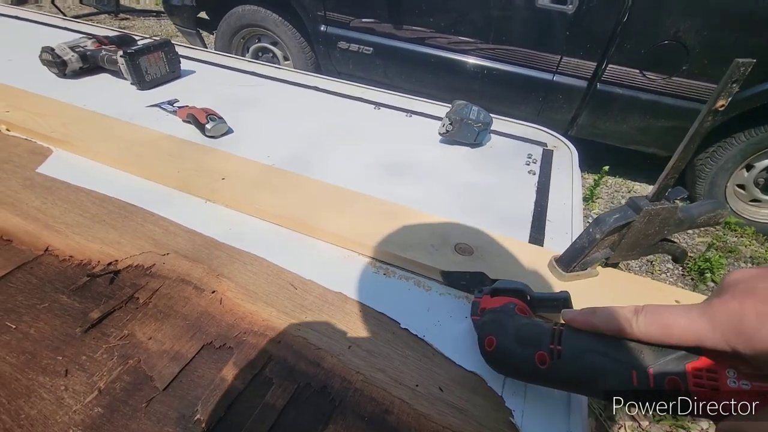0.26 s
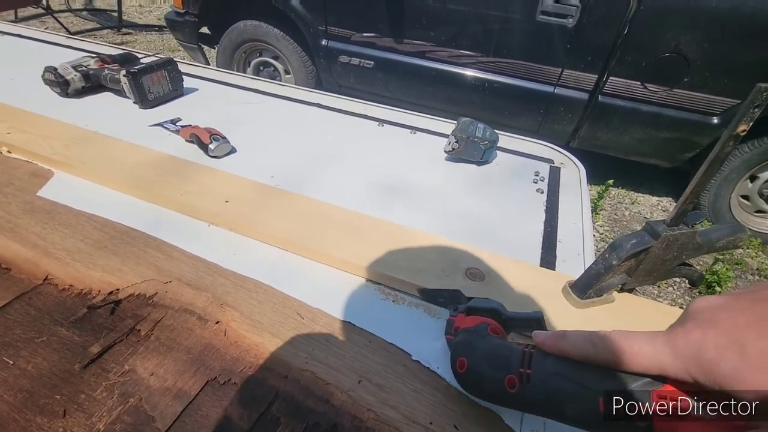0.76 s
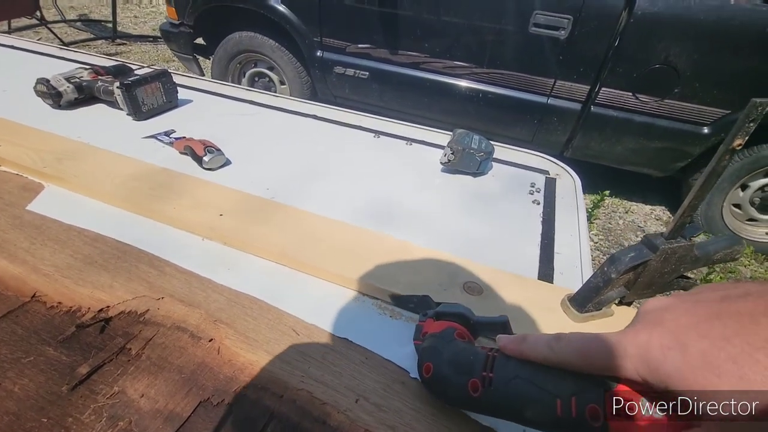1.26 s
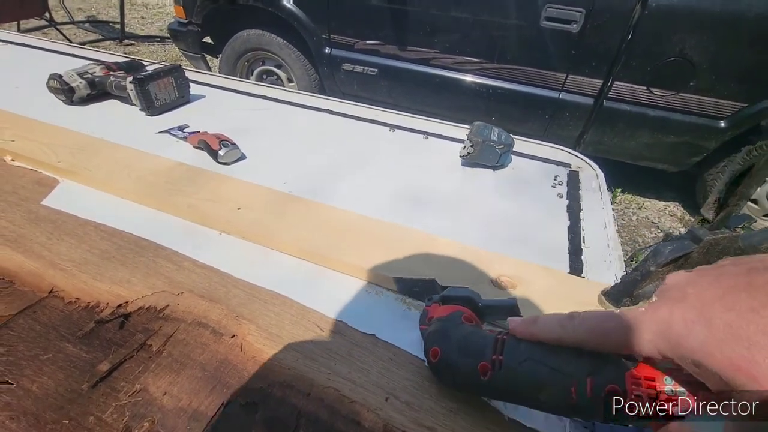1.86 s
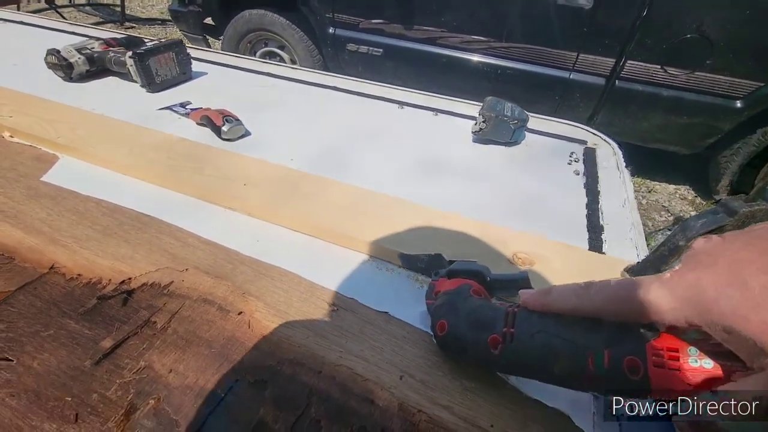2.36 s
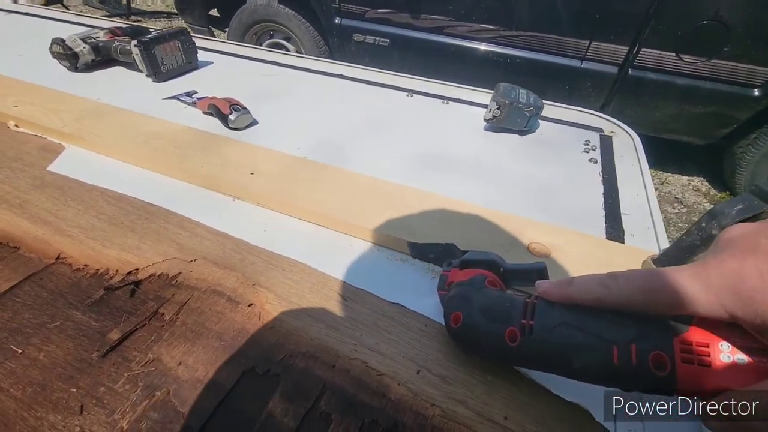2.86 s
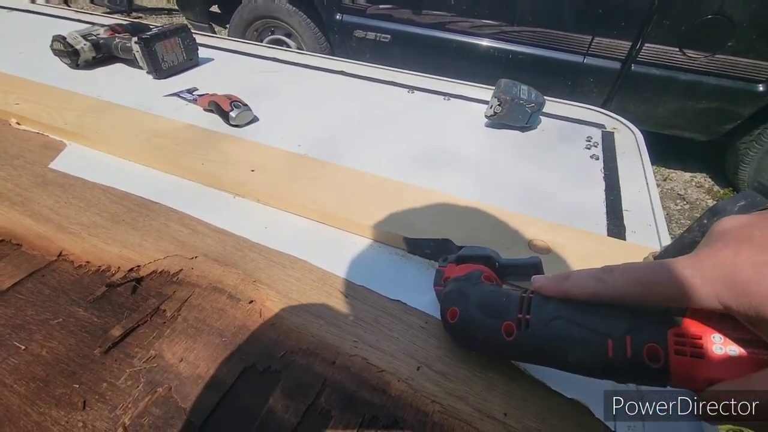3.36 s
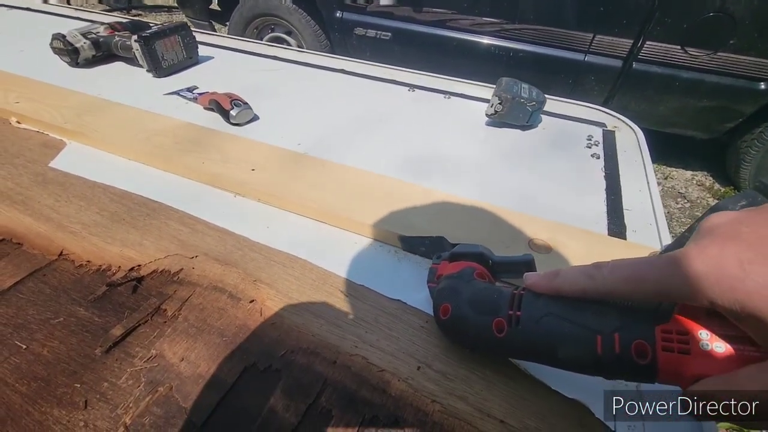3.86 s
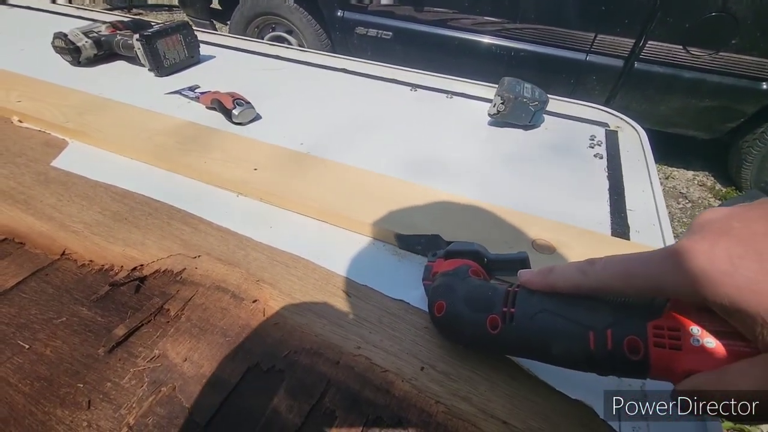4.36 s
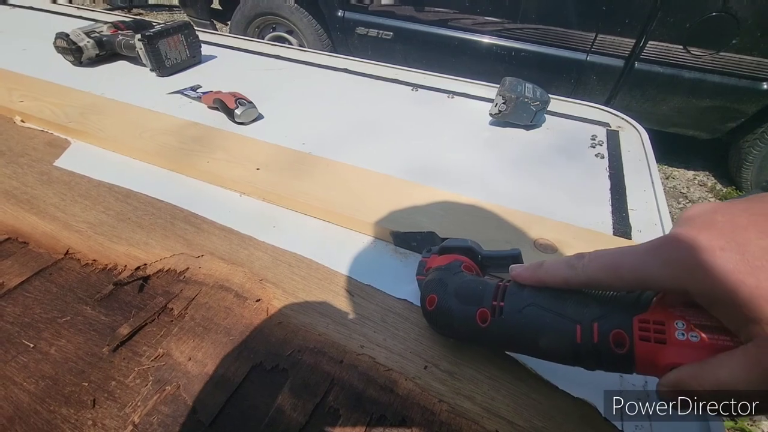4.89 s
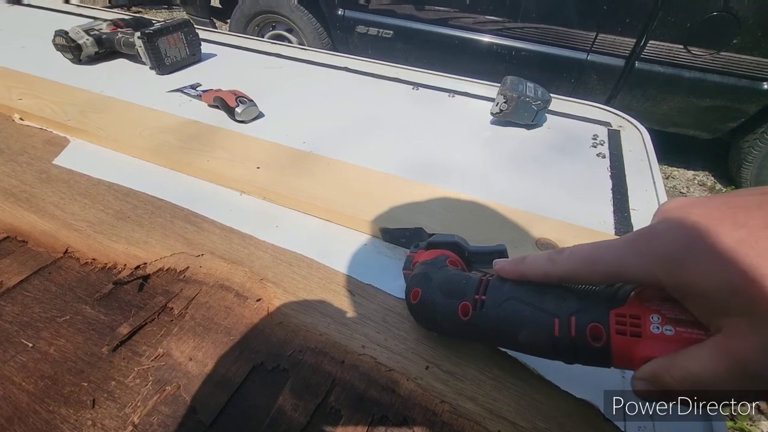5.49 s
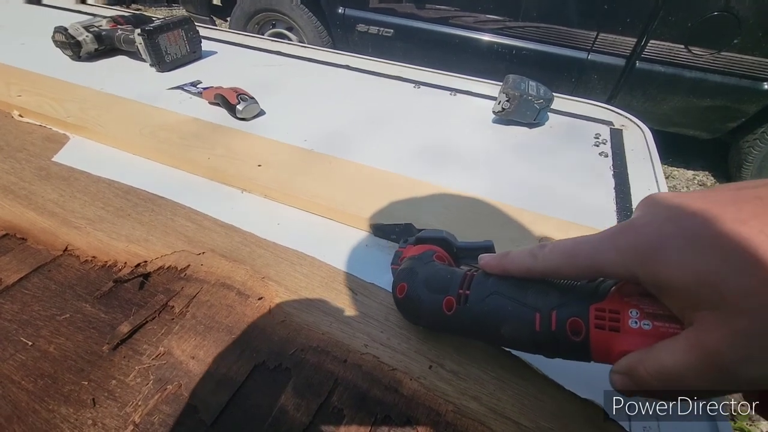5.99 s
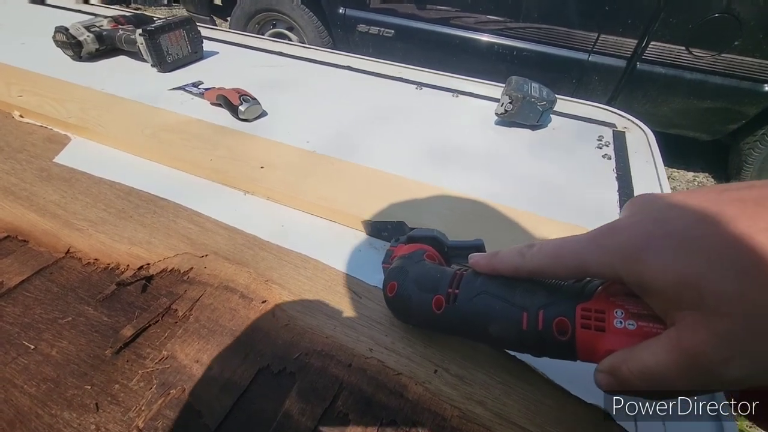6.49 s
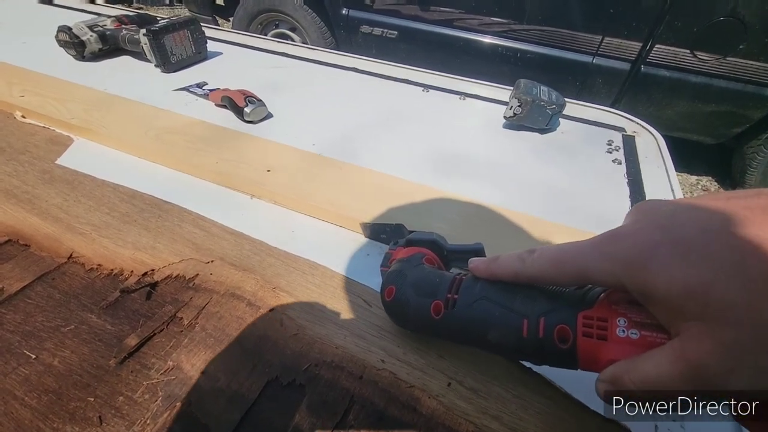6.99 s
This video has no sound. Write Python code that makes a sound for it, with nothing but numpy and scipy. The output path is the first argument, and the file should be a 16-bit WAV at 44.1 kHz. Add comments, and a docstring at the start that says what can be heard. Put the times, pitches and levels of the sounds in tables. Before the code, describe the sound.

Close up and outdoors, an oscillating saw buzzes without a break as its blade works into a wooden panel. The panel hums while the teeth add a gritty hiss, smoother for a moment early on and rougher later. The blade sings briefly at shifting high pitches. Three dull little bumps come around the middle, and low gusts of wind buffet the microphone, mostly toward the end.

```python
"""Oscillating saw cutting a wood panel

Outdoors, a battery tool swings its blade about 250 times a second. The panel hums at low multiples of
that rate, the housing and blade buzz at high ones, and the teeth rasp on every stroke. The tool bumps
the panel a few times, and wind buffets the two nearby microphones, left and right."""
import sys
import numpy as np
from scipy import signal
from scipy.fft import rfft, irfft, next_fast_len
from scipy.io import wavfile
from scipy.ndimage import uniform_filter1d, map_coordinates

SR = 44100
rng = np.random.default_rng(int(sys.argv[2]) if len(sys.argv) > 2 else 0)


def transcribe(signal):
    """Save signal, clipped to [-1, 1], as a 16-bit WAV file at the path in sys.argv[1]."""
    frames = np.atleast_2d(signal).T
    limited = np.clip(frames, -1, 1)
    pcm = np.round(limited * 32767).astype(np.int16)
    wavfile.write(sys.argv[1], SR, pcm)


N = 319284

# How fast the blade swings: time_s, rate_hz
SWING_RATE = [(0, 239), (.08, 242.8), (.32, 244.8), (.7, 249.3), (.89, 251.6), (1.53, 252.6), (1.81, 252),
              (2.0, 253.6), (2.48, 253.8), (2.76, 251.3), (2.9, 253), (3.06, 250.7), (3.34, 248.8),
              (3.51, 250.8), (3.81, 249.8), (4.76, 249), (4.9, 245.8), (5.26, 246), (5.36, 244.2),
              (5.79, 244), (6.37, 247.3), (7.24, 246.3)]
# How roughly the teeth tear the wood: time_s, rasp_gain_db
ROUGHNESS = [(0, 1), (.6, 1.5), (1.3, 1.5), (1.9, 2.5), (2.25, -6), (2.5, -3.5), (2.8, -5), (3.3, 2.5),
             (3.6, 2), (3.9, 1.5), (4.5, -1.5), (4.75, 0.5), (5.0, 4.5), (5.4, 1.5), (6.0, 5), (6.4, 2.5),
             (6.7, 1.5), (7.24, 1.5)]
# The hand holds the tool in seven ways, one after another: start_s, end_s
GRIP_TIMES = [(0, .3), (1.2, 2.0), (2.5, 2.75), (3.55, 4.75), (4.9, 5.3), (5.75, 6.2), (6.4, 7.24)]

# The panel's hum, a row for each grip and a column for each of its six tones: level_db
HUM_LEVELS = [(-27.6, -35, -26.5, -35.5, -27.5, -27), (-32, -35, -25.5, -27, -30.5, -32),
              (-31.5, -37, -21, -34.5, -29.5, -28), (-27, -24.5, -28.5, -36, -28.5, -34),
              (-22, -34, -29, -38, -24.5, -27), (-20.5, -33, -31, -41.5, -24.5, -30.5),
              (-21, -26.5, -38.5, -32, -28, -33.5)]
# Which side each hum tone leans to, same layout: left_minus_right_db
HUM_BALANCE = [(-6, -6, -5, -6, -1, 0), (-6, -1, -2, -10, -3, 0), (-5, -6, -2, -7, -1.5, 1),
               (2.5, -9, -5, -4, 0, 4), (4.5, -10, -3, -11, -4, -1), (3, -9, -3, -9, -4, -2),
               (.7, -7.5, -3, -7, -4, -2.5)]
# How far each hum tone is ahead on the left, same layout: lead_radians
HUM_LEFT_LEAD = [(-.55, -2.35, -2.2, -3.1, -2.2, -3.2), (-1, -2.9, -2.2, -2.7, -2.15, -3.2),
                 (-1.4, -2.9, -2.25, -2.4, -2.85, -3.2), (-1.5, -2.5, -2.45, -2.2, -3.05, -2.2),
                 (-1.1, -2, -2.1, -2.9, -2.7, -3), (-.8, -1.9, -2.05, -2.65, -2.6, -2.9),
                 (-.5, -1.75, -2, -2.4, -2.7, -2.3)]
# The unsteady part of each of the six hum tones: level_db
HUM_FLICKER = [-47, -39, -40, -41, -40, -41]

# Basic strength of a buzz tone: pitch_hz, level_db
BUZZ_LEVELS = [(1700, -29), (2000, -30.5), (2500, -28), (2750, -31), (3250, -24), (3750, -30.5),
               (4400, -29), (5000, -29.5), (5700, -33.5), (6700, -31.5), (7500, -39), (8300, -42),
               (8900, -40.5), (11500, -51), (15000, -39.5)]
# How much of the buzz flickers, before roughness changes it: pitch_hz, share_0_to_1
BUZZ_FLICKER = [(1700, 0.29), (3100, 0.44), (4500, 0.52), (15000, 0.73)]
# How alike the buzz is on the two sides: pitch_hz, likeness_0_to_1
BUZZ_LIKENESS = [(1500, .9), (3200, .92), (5000, .8), (6500, .6), (10000, .45)]
# Extra delay of the buzz on the left, a row for each grip: delay_s
BUZZ_LEFT_DELAY = [(35e-6,), (-23e-6,), (23e-6,), (20e-6,), (0,), (-23e-6,), (0,)]
# How rough tearing dulls the buzz: pitch_hz, buzz_db_per_rasp_db
DULLING = [(1870, -0.65), (2370, -0.5), (3120, -0.25), (4500, -0.1), (6300, -0.12), (9100, -0.48)]
# How the buzz changes from start to end as the cut deepens: pitch_hz, change_db
DEPTH_CHANGE = [(1870, -0.5), (2370, -0.5), (3120, 6.5), (3700, -1), (4500, 2), (6300, -4.5), (7500, -3.5),
                (9100, -3)]
# How the buzz differs while the blade is just entering: pitch_hz, gain_db
ENTRY_GAIN = [(1870, 3.5), (2370, -1), (2800, -8), (3250, -5), (3600, 3.5), (4500, 1.5), (6300, 0.5),
              (9100, -2.5)]
# Moments when the blade sings (or dips) near one pitch: middle_s, length_s, pitch_hz, gain_db
BLADE_SINGS = [(0.113, 0.3, 4850, 7.5), (1.297, 1.24, 3150, 4), (1.3, .8, 6500, 2.5),
               (1.313, 0.13, 4130, 10), (1.972, 0.32, 1860, 25), (1.41, 0.64, 9000, 8),
               (2.25, 0.81, 8700, 8.5), (.3, 0.54, 1720, -6), (4.602, 1.6, 9460, 6.5),
               (2.347, 0.071, 5720, 12), (2.698, 1.2, 2290, 10), (2.8, 0.24, 4720, 9),
               (2.996, 0.88, 1800, -0.5), (3.193, 1.3, 2930, 5.5), (3.755, 1.4, 3290, 7),
               (4.5, 1.8, 2400, 4), (4.715, 0.57, 3100, 7), (5.017, 0.21, 1950, 13.5), (5.3, 0.8, 2500, 3),
               (5.3, 1, 7560, 6.5), (4.0, 1, 5960, 5.5), (5.298, 0.59, 5100, 7), (5.45, 0.25, 3330, 9),
               (6.386, 0.42, 3380, 4), (6.9, .6, 1750, 0.5), (6.9, 0.59, 2600, 8)]

# Basic strength of the teeth's noise, from low to high: pitch_hz, level_db_per_hz
RASP_LEVELS = [(150, -82), (400, -77), (870, -76), (1150, -69), (1400, -70), (1620, -66), (2050, -70),
               (2400, -63.5), (2900, -61), (3300, -57), (3800, -64), (4450, -64.5), (4900, -60.5),
               (5600, -62.5), (6900, -61.5), (8300, -68.5), (9000, -66), (10300, -70.5), (12600, -64.5),
               (15000, -63.5)]
# How alike the rasp is on the two sides: pitch_hz, likeness_0_to_1
RASP_LIKENESS = [(300, .3), (1100, .55), (1400, .92), (1700, .8), (2500, .35), (3100, .6), (4000, .35),
                 (8000, .35), (11000, .05)]
# Which side the buzz and rasp lean to: pitch_hz, left_minus_right_db
TOOL_BALANCE = [(1300, -1.5), (1900, 10), (2400, -3.5), (3200, 1.5), (4700, 7.5), (5800, 0.5), (7500, -4.5),
                (9500, 0.5), (15000, 1)]
# How far the buzz and rasp are ahead on the left: pitch_hz, lead_radians
TOOL_LEFT_LEAD = [(0, 0), (430, -2), (1000, -2.5), (1380, -3.1), (2070, -3.2), (3700, -9), (4910, -9.5),
                  (5860, -13.5), (6290, -16), (8870, -18.5), (13500, -47), (16300, -55.5)]

# The tool knocks on the panel: start_s, left_gain_db, left_minus_right_db
BUMP_EVENTS = [(3.42, -28, 8), (3.78, -26, 6), (4.797, -18, 9)]
# The tones of the knocked panel: pitch_hz, level_db, time_to_fade_60_db_s
PANEL_TONES = [(180, -4, .12), (310, 0, .11), (430, -1, .1), (600, -6, .08), (900, -10, .07)]
# The shape of the wind's rumble: pitch_hz, relative_level_db
WIND_SHAPE = [(15, -59), (30, -10), (70, -1), (110, -8.5), (170, -13), (300, -13), (600, -50)]
# Gusts of wind: middle_s, left_db, right_db
WIND_GUSTS = [(.47, -40, -30), (1.5, -50, -57), (1.87, -57, -42), (2.45, -57, -43), (3.0, -42, -50),
              (3.4, -37, -56), (3.85, -32.5, -45), (4.6, -43, -66), (4.9, -37, -50), (5.15, -34, -30.5),
              (5.6, -31, -32), (5.95, -45, -43), (6.3, -39, -42), (6.55, -35, -40), (7.0, -33, -38)]

SIDES = np.array([[.5], [-.5]])  # splits a difference evenly between left and right
STEP = 64  # samples between updates of the buzz's loudness


def blade_swing():
    """The angle of the blade's cycle at each sample; the load jogs the motor's speed a little."""
    rate_hz = curves(SWING_RATE)[0] + 0.274 * wobble(25) + 0.322 * wobble(70)
    return 2 * np.pi * np.cumsum(rate_hz) / SR


def panel_hum(angle, throb_start_s=3.03, throb_end_s=3.3, throb_depth=.35):
    """The blade shakes the panel: six nearly clean tones at 1 to 6 times the swing rate."""
    t = np.arange(N) / SR
    throb_fade = np.clip(np.minimum(t - throb_start_s, throb_end_s - t) / .04, 0, 1)
    throb = 1 + throb_depth * throb_fade * np.sin(angle / 6)  # one throb in six swings
    out = np.zeros((2, N))
    tones = zip(by_grip(HUM_LEVELS), by_grip(HUM_BALANCE), by_grip(HUM_LEFT_LEAD), HUM_FLICKER)
    for multiple, (db, balance_db, lead, flicker_db) in enumerate(tones, 1):
        # The last term keeps the total power the same whichever side the tone leans to.
        db = db + SIDES * balance_db - 10 * np.log10(np.cosh(balance_db * np.log(10) / 20))
        phase = multiple * angle + SIDES * lead + rng.uniform(0, 2 * np.pi)
        tone = np.sqrt(2) * amp(db) * np.cos(phase) * (throb if multiple == 1 else 1)
        flicker = wobble(75) * np.cos(phase) + wobble(75) * np.sin(phase)
        out += tone + amp(flicker_db + db - db.mean(axis=0)) * flicker
    return out


def tool_buzz(angle, count=55, lowest_multiple=7):
    """Housing and blade buzz at high multiples of the swing; loose parts make each fade and flicker."""
    hz = (lowest_multiple + np.arange(count)) * np.mean(SWING_RATE, axis=0)[1]
    t = np.arange(N // STEP + 2) * STEP / SR
    likeness = at_pitch(BUZZ_LIKENESS, hz)[:, None]
    roughness_db = np.interp(t, *np.transpose(ROUGHNESS))
    flicker_share = np.clip(np.outer(at_pitch(BUZZ_FLICKER, hz), amp(0.55 * roughness_db)), 0, 1)
    steady = stereo(1, drifts(1.5, 2 * count).reshape(2, count, -1), likeness)
    flicker = stereo(drifts(60, count), drifts(60, 2 * count).reshape(2, count, -1), likeness)
    blend = np.sqrt(1 - flicker_share) * steady + np.sqrt(flicker_share) * flicker
    chatter_db = 0.25 * drifts(32, 1).real  # the blade skips in the cut, moving all tones together
    fade_db = 1.4 * drifts(2.5, count).real
    level = amp(at_pitch(BUZZ_LEVELS, hz)[:, None] + cutting_gain_db(hz, t) + chatter_db + fade_db)
    start_phase = np.exp(2j * np.pi * rng.uniform(size=(count, 1)))
    delay_s = np.interp(t, np.arange(N) / SR, by_grip(BUZZ_LEFT_DELAY)[0])
    grip_phase = np.exp(-2j * np.pi * SIDES[..., None] * np.outer(hz, delay_s))
    gains = path_to_mics(hz)[..., None] * grip_phase * level * start_phase * blend
    return add_tones(angle, gains, lowest_multiple)


def cutting_gain_db(hz, t, entry_fade_s=(.5, .85), sing_width_octaves=0.08):
    """Gain by pitch and time as the blade tears roughly, goes deeper, first enters and briefly sings."""
    gain = np.outer(at_pitch(DULLING, hz), np.interp(t, *np.transpose(ROUGHNESS)))
    gain += np.outer(at_pitch(DEPTH_CHANGE, hz), t * SR / N - .5)
    gain += np.outer(at_pitch(ENTRY_GAIN, hz), np.interp(t, entry_fade_s, [1, 0]))
    for middle_s, length_s, pitch_hz, db in BLADE_SINGS:
        band = np.exp(-(np.log2((hz + 1) / pitch_hz) / sing_width_octaves) ** 2)
        swell = np.exp(-(2 * (t - middle_s) / length_s) ** 2)
        gain += db * np.outer(band, swell)
    return gain


def teeth_rasp(angle, frame_samples=512):
    """Teeth tear the wood fibres: noise that swells on both the forward and the back stroke."""
    strokes = 1 + .25 * np.cos(angle) + .3 * np.cos(2 * angle + 1)
    strokes *= amp(curves(ROUGHNESS)[0] + 1.4 * wobble(30))
    hz, t, noise = signal.stft(rng.standard_normal((3, N)) * strokes, SR, nperseg=frame_samples)
    spectrum = stereo(noise[0], noise[1:], at_pitch(RASP_LIKENESS, hz)[:, None])
    patches = amp(1.6 * random_patches(spectrum.shape[1:], bins=5, frames=3))
    follow_buzz = amp(.6 * cutting_gain_db(hz, t) * (hz[:, None] > 1600))  # only the treble follows
    level = np.sqrt(SR / 2) * amp(at_pitch(RASP_LEVELS, hz))[:, None]
    spectrum *= patches * follow_buzz * level * path_to_mics(hz)[..., None]
    return signal.istft(spectrum, SR, nperseg=frame_samples)[1][:, :N]


def panel_bumps(rise_s=.006):
    """The tool knocks on the panel, which rings with a few dull, short tones."""
    out = np.zeros((2, N + SR))
    t = np.arange(SR // 4) / SR
    for start_s, left_db, balance_db in BUMP_EVENTS:
        ring = sum(amp(db + rng.normal(0, 0.71) - 60 * t / fade_s) * np.sin(2 * np.pi * hz * t)
                   for hz, db, fade_s in PANEL_TONES)
        knock = ring * (1 - np.exp(-t / rise_s))
        start = round(start_s * SR)
        out[:, start:start + len(t)] += amp([[left_db], [left_db - balance_db]]) * knock
    return out[:, :N]


def wind(calm_db=-49, gust_half_length_s=0.22):
    """Air buffets each microphone separately: a low, lumpy rumble that swells in gusts."""
    size = next_fast_len(N + 8192)
    shape = amp(at_pitch(WIND_SHAPE, np.fft.rfftfreq(size, 1 / SR)))
    rumble = irfft(rfft(rng.standard_normal((2, size))) * shape, size)[:, :N]
    rumble *= amp(2.2 * np.array([wobble(14), wobble(14)]))  # the lumps
    t = np.arange(N) / SR
    gusts = sum(amp(sides_db)[:, None] * np.exp(-((t - middle_s) / gust_half_length_s) ** 2)
                for middle_s, *sides_db in WIND_GUSTS)
    return (amp(calm_db) + gusts) * rumble / rumble.std(axis=1, keepdims=True)


def path_to_mics(hz):
    """The tool's sound reaches the two microphones with different strength and delay."""
    lead = np.interp(hz, *np.transpose(TOOL_LEFT_LEAD))
    return amp(SIDES * at_pitch(TOOL_BALANCE, hz)) * np.exp(1j * SIDES * lead)


def add_tones(angle, gains, lowest_multiple):
    """Add up multiples of the swing. Complex gains (side, tone, step) set their strength and phase."""
    ramp = np.arange(STEP) / STEP
    turn = np.exp(1j * np.pad(angle, (0, -N % STEP))).reshape(-1, STEP).astype(np.complex64)
    tone = turn ** (lowest_multiple - 1)
    out, steps = 0, len(turn)
    for gain in gains.astype(np.complex64).swapaxes(0, 1)[..., None]:
        tone = tone * turn  # the next multiple up
        smooth_gain = gain[:, :steps] + np.diff(gain, axis=1)[:, :steps] * ramp
        out = out + (smooth_gain * tone).real
    return np.sqrt(2) * out.reshape(2, -1)[:, :N]


def stereo(shared, separate, likeness):
    """Mix a part both sides share with a part each side has to itself."""
    return np.sqrt(likeness) * shared + np.sqrt(1 - likeness) * separate


def by_grip(rows):
    """A curve for each column: steady while a grip is held, gliding between grips."""
    return np.array(curves([(s, *row) for span, row in zip(GRIP_TIMES, rows) for s in span]))


def curves(rows):
    """Turn (time_s, values...) rows into curves with one value for each sample."""
    times_s, *columns = np.transpose(rows)
    return [np.interp(np.arange(N) / SR, times_s, column) for column in columns]


def at_pitch(rows, hz):
    """Read between (pitch_hz, value) rows, with octaves evenly spaced."""
    pitches_hz, values = np.transpose(rows)
    return np.interp(np.log(hz + 1), np.log(pitches_hz + 1), values)


def wobble(points_per_s):
    """A smooth curve through random points, up to 80 a second."""
    points = rng.standard_normal(int(N * 80 / SR) + 4)
    return map_coordinates(points, [np.arange(N) * points_per_s / SR])


def drifts(points_per_s, count):
    """Smooth complex curves through random points, up to 70 a second; one value every STEP samples."""
    positions = np.arange(N // STEP + 2) * STEP * points_per_s / SR
    points = rng.standard_normal((2 * count, int(N * 70 / SR) + 6))
    real, imag = np.array([map_coordinates(row, [positions]) for row in points]).reshape(2, count, -1)
    return (real + 1j * imag) / np.sqrt(2)


def random_patches(shape, bins, frames):
    """Random values of typical size 1, smoothed across pitch (bins) and time (frames)."""
    patches = uniform_filter1d(rng.standard_normal(shape), bins, axis=-2)
    for _ in range(2):
        patches = uniform_filter1d(patches, frames, axis=-1)
    return patches / patches.std()


def amp(db):
    """Turn decibels into a number to multiply by."""
    return 10 ** (np.asarray(db) / 20)


def scene():
    """One swinging blade drives the hum, buzz and rasp; bumps and wind join them."""
    angle = blade_swing()
    return panel_hum(angle) + tool_buzz(angle) + teeth_rasp(angle) + panel_bumps() + wind()


def record(dry, top_hz=15520):
    """Flatten the loudest peaks at full scale and remove everything above top_hz."""
    flattened = dry / (1 + abs(dry) ** 12) ** (1 / 12)
    size = next_fast_len(N + 8192)
    kept = np.fft.rfftfreq(size, 1 / SR) < top_hz
    return irfft(rfft(flattened, size) * kept, size)[:, :N]


dry = scene()
out = record(dry)
transcribe(out)
```